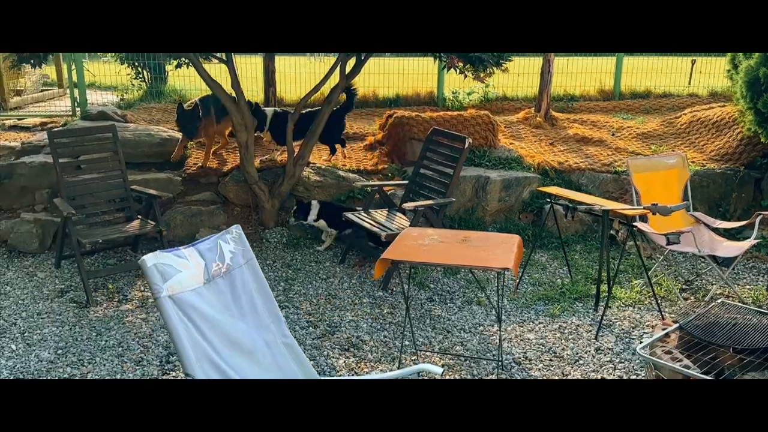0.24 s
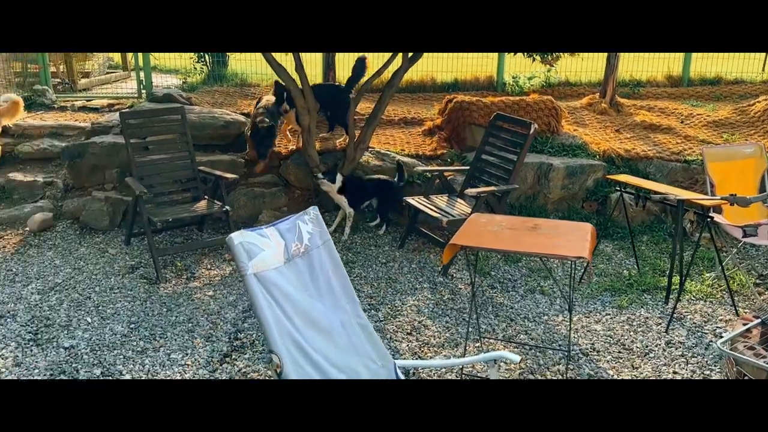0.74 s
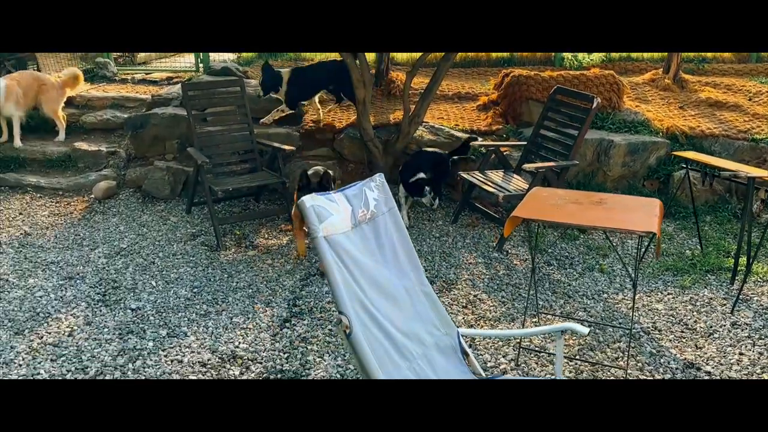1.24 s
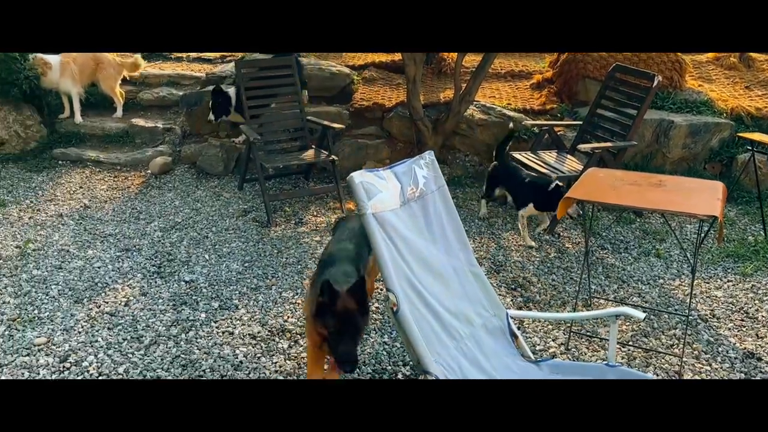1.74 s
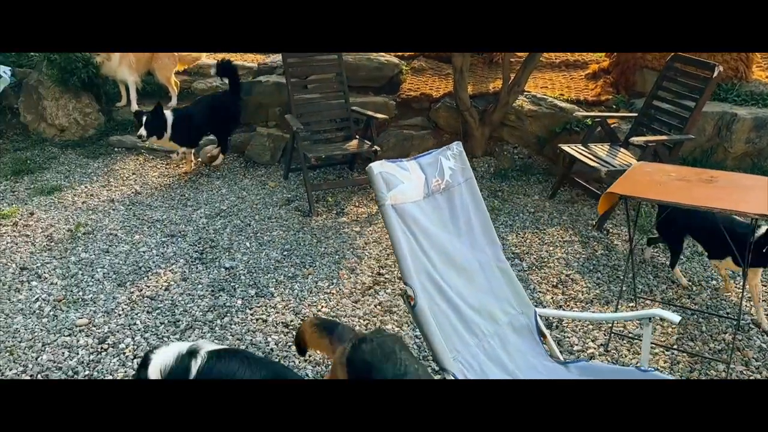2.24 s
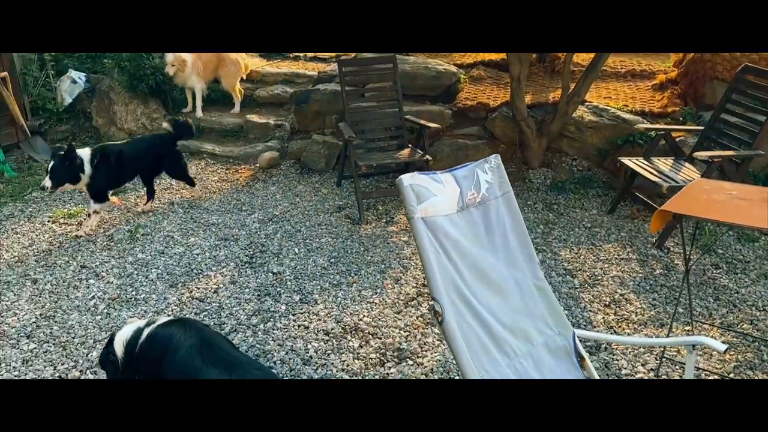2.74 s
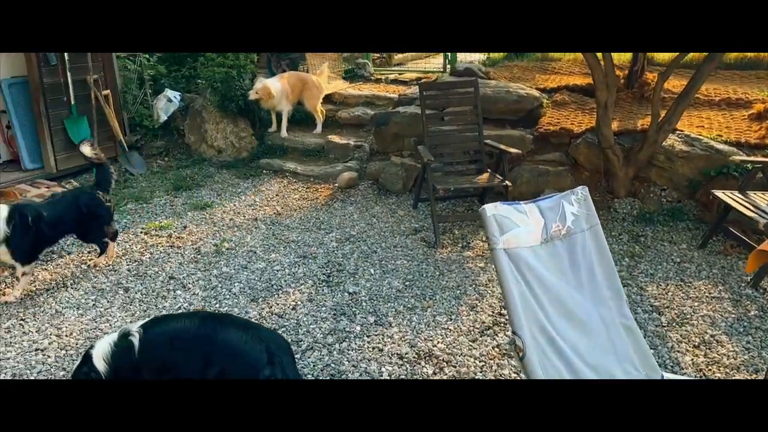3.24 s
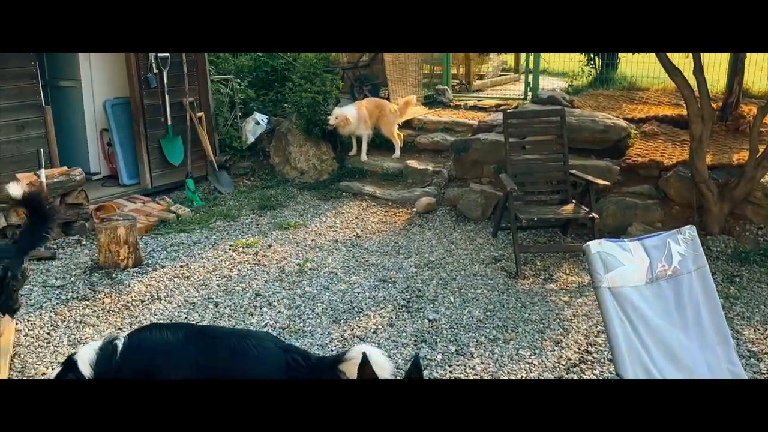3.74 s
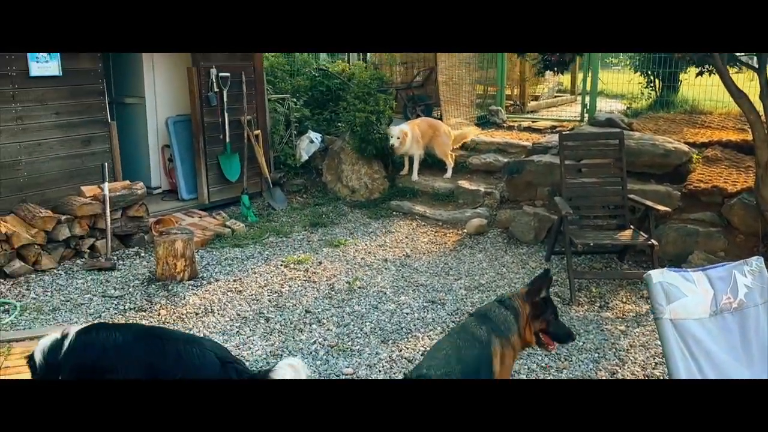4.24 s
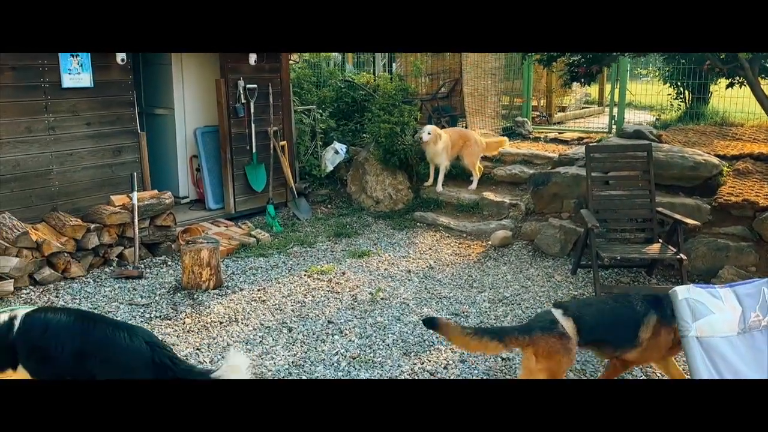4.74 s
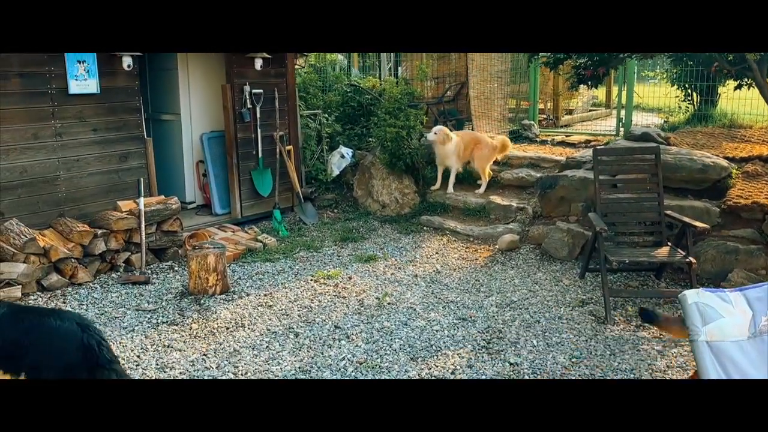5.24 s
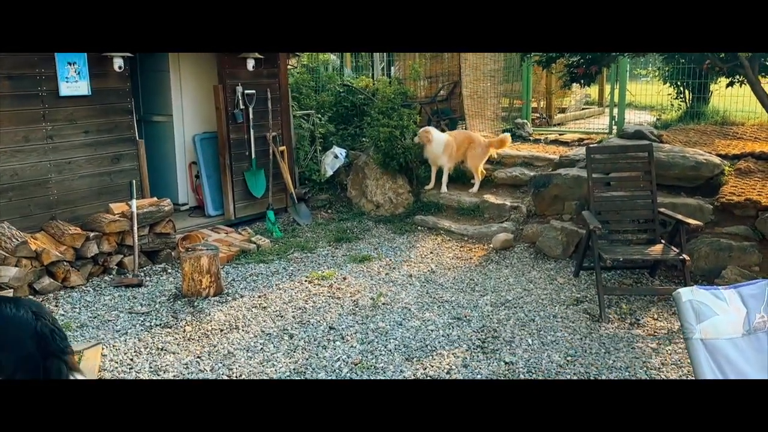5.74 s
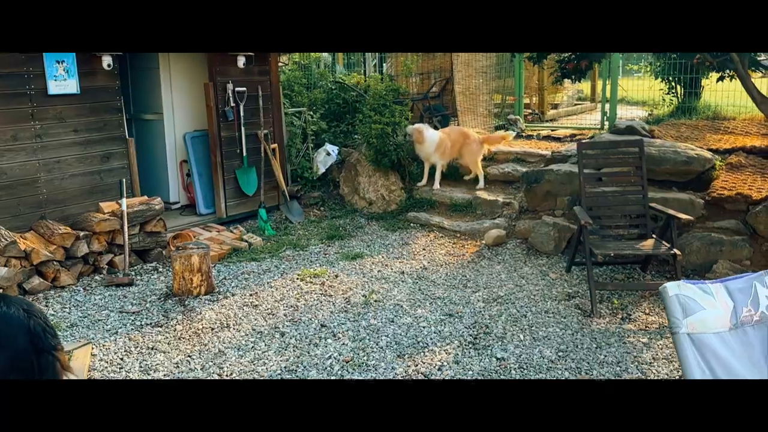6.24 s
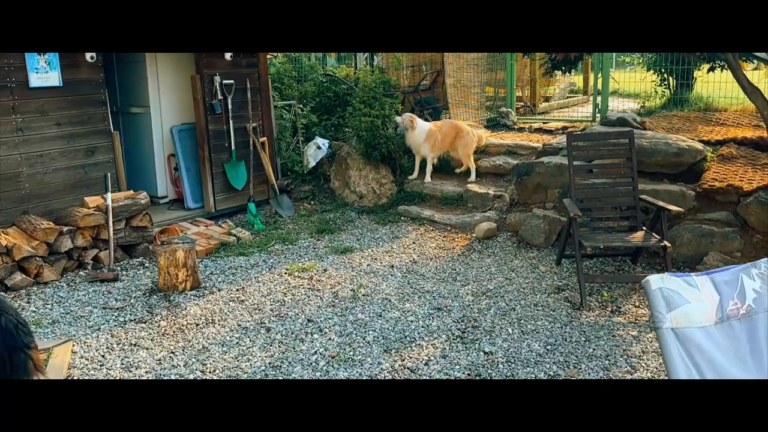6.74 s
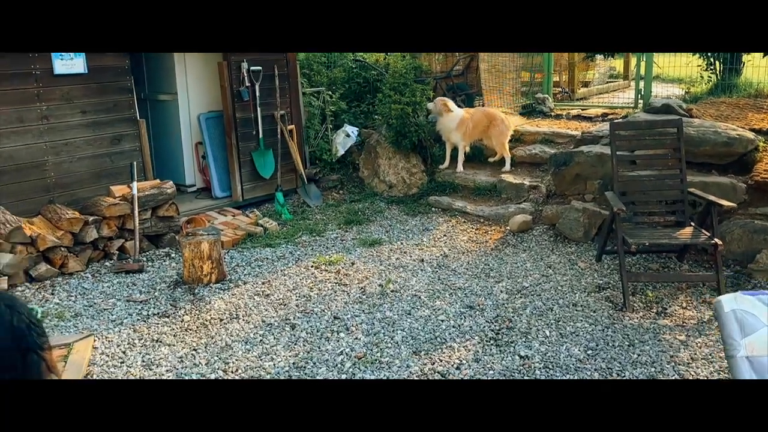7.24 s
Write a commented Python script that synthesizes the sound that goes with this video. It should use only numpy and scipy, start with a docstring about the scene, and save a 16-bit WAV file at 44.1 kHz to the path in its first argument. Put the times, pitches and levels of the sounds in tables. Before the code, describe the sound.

Quick panting from a bigger and a smaller dog mixes with paws scuffing gravel. A few dull taps come first, then the crunch comes nearer and brighter with crisp stone clicks. A short, high, rising and falling yip stands out near the middle, with slight echoes; a quieter one comes later, towards the right. Thin whistling whines and hoarse little huffs come between. Close, dry outdoor sound with a faint traffic rumble.

```python
"""Dogs in a gravel yard

Paws crunch on stones (ringing grains, noise and sharp snaps) and tongues pant (noise through throat resonances).
One dog yips twice, clear and near, then softer to the right, from a few harmonics and hoarse noise.
Three thin nasal whistles glide on curves of their own; voices get echoes and a short tail.
Taps and hoarse huffs come between, over the shaped noise of distant traffic and outdoor hiss."""
import sys
import numpy as np
from scipy import signal
from scipy.fft import rfft, irfft
from scipy.io import wavfile

SR = 44100
rng = np.random.default_rng(int(sys.argv[2]) if len(sys.argv) > 2 else 0)


def pcm_store(signal):
    """Save signal as 16-bit PCM."""
    levels = np.round(np.clip(np.atleast_2d(signal), -1, 1) * 32767)
    wavfile.write(sys.argv[1], SR, levels.astype(np.int16).T)


N = 330309   # length in samples, about 7.5 s

# Distant hum and outdoor hiss. Each row: frequency in Hz, relative level in dB.
AIR_SPECTRUM = [(25, -30.5), (42, -11.5), (66, 1), (95, -8), (170, -16), (400, -17), (1300, -20),
                (2600, -28.5), (6000, -24), (10000, -65.5), (13000, -35), (16500, -44)]
AIR_DB = -52.5
# How alike left and right are in the air sound. Each row: frequency in Hz, likeness from -1 to 1.
AIR_LIKENESS = [(60, 0.99), (150, 0.92), (380, 0.72), (950, -0.51), (2380, -0.78), (5980, 0.38),
                (15000, 0.91)]

# Steady shuffling and breath under the single events.
# Each row: time in seconds, shuffle level in dB, breath level in dB, ms by which the left side of the breath lags.
PACK = [(0, -57, -56, -0.19), (1, -56.5, -64, -0.14), (2, -52, -54.5, -0.065), (3.2, -47, -52, -0.094),
        (4.4, -49, -58.5, -0.098), (5.4, -56, -69.5, -0.25), (6.4, -55.5, -70.5, 0.17),
        (7.49, -55.5, -58.5, 0.097)]
# Paws set down and dragged. Each row: time in seconds, length scale in seconds, level in dB.
STEPS = [(0.082, 0.021, -52.5), (0.16, 0.1, -49.5), (0.4, 0.04, -48.5), (0.462, 0.032, -47),
         (0.512, 0.042, -39.5), (0.824, 0.072, -49.5), (0.938, 0.17, -52), (1.157, 0.079, -49),
         (1.302, 0.07, -48.5), (1.385, 0.11, -44.5), (1.561, 0.1, -48.5), (1.631, 0.21, -44),
         (1.858, 0.015, -36.5), (1.958, 0.051, -50), (2.064, 0.081, -36.5), (2.292, 0.13, -42),
         (2.543, 0.035, -61), (2.759, 0.049, -43.5), (2.821, 0.099, -40.5), (2.942, 0.051, -47),
         (3.09, 0.14, -42), (3.27, 0.07, -43.5), (3.394, 0.072, -45), (3.599, 0.15, -50.5),
         (3.868, 0.15, -53), (4.197, 0.3, -51), (4.4, 0.21, -40), (4.676, 0.17, -43), (4.904, 0.18, -40),
         (5.082, 0.079, -36), (5.245, 0.17, -44.5), (5.427, 0.25, -44.5), (5.769, 0.15, -47.5),
         (5.893, 0.078, -48.5), (5.991, 0.074, -50), (6.095, 0.062, -49), (6.198, 0.018, -44),
         (6.268, 0.079, -49.5), (6.484, 0.038, -47), (6.531, 0.1, -45), (6.65, 0.037, -52),
         (6.735, 0.12, -44.5), (6.932, 0.032, -43), (7.051, 0.067, -50), (7.242, 0.14, -61)]
# Tone colour of the gravel. Each row: frequency in Hz, relative level in dB.
GRAVEL_SPECTRUM = [(400, -24), (700, -9), (1200, -12.5), (2600, -9), (4400, -9), (7000, -2.5), (9600, -1),
                   (12000, -9.5), (15000, -10), (16500, -11.5)]
GRAINS_PER_S = 1300   # typical rate; it wanders
# Gain of the gravel's top octave, lower while the paws are far off. Each row: time in seconds, gain in dB.
TREBLE = [(0, -29), (0.9, -6), (1.7, -1), (2.3, 1), (3.2, 6), (4.7, -5.5), (5.4, -4), (7.49, -1.5)]
TREBLE_FROM_HZ = 10600
FULL_TURN_HZ = 9700   # sound from the ground: the left lags more with pitch, one whole cycle from here up

# Panted breaths. Each row: time in seconds, length scale in seconds, level in dB.
PANTS = [(0.062, 0.18, -47.5), (0.444, 0.12, -41), (0.82, 0.22, -45.5), (1.207, 0.057, -51),
         (1.303, 0.11, -45.5), (1.665, 0.14, -46), (1.804, 0.081, -48), (2.065, 0.11, -45),
         (2.34, 0.061, -46), (2.413, 0.044, -48.5), (2.659, 0.083, -43), (2.752, 0.03, -36),
         (3.107, 0.16, -49.5), (3.3, 0.048, -43), (3.38, 0.048, -42.5), (3.44, 0.068, -46.5),
         (3.889, 0.15, -46), (4.291, 0.18, -43), (4.708, 0.14, -45), (5.05, 0.2, -44), (5.583, 0.07, -41),
         (5.91, 0.091, -51), (6.237, 0.097, -48.5), (6.343, 0.11, -45), (6.697, 0.15, -50),
         (6.877, 0.23, -49), (7.18, 0.1, -52)]
# Panting throat of the bigger dog.
# Each row: frequency in Hz, width of each of two filter passes in Hz, relative level in dB.
THROAT = [(781, 320, 0.5), (1196, 477, 3), (1674, 447, 1), (2470, 660, -4.5)]
SMALL_THROAT_RISE = 1.225   # the smaller dog's resonances lie this many times higher
# How wide the panting mouths are open and who is heard.
# Each row: time in seconds, brightness in dB per octave, smaller dog's share of the power from 0 to 1.
GAPE = [(0, 4, .1), (0.9, 1, 0.3), (1.5, -4.5, 0.53), (2.3, -1, 0.39), (3.4, 3.5, 0.6), (3.95, 2, 0.3),
        (4.4, -4, 0.4), (5.1, 0.5, 0.4), (5.95, -4, .55), (6.4, -0.3, 0.8), (7.0, -3, 0.43),
        (7.49, 1.5, .15)]

# The loudest stones that snap under a paw.
# Each row: start in seconds, level in dB before a common trim, body level in dB relative to the crack.
STONES = [(0.17, -41.5, 24), (0.4165, -24, -19), (0.5235, -33.5, 17), (0.951, -36, 12.5),
          (0.9966, -25, -25), (1.0576, -21, -15), (1.069, -29.5, 5.5), (1.6963, -14.5, -0.5),
          (1.8626, -21, -29), (1.9226, -33, -31), (2.0875, -7, -4.5), (2.203, -27.5, 1), (2.322, -18, -23),
          (2.8459, -14.5, -22), (2.9818, -16.5, -27), (3.2044, -11, -10), (3.2944, -9.5, -34),
          (3.3068, -15, -25), (3.4682, -15, -27), (3.6293, -12, -21), (3.6648, -13, -8.5),
          (3.671, -18, -11), (3.912, -14.5, -10), (3.963, -13.5, -2), (3.969, -16.5, 7), (4.2098, -9, -18),
          (4.214, -11, -10), (4.224, -12, -1.5), (4.232, -17.5, -2), (4.2375, -11, -6),
          (4.2413, -10.5, -10), (4.4756, -12.5, -9), (4.4985, -12.5, -3), (4.697, -16, 5),
          (4.9281, -12.5, -18), (5.1633, -9, -4.5), (5.442, -36, -2), (5.8392, -14, -22),
          (5.909, -19.5, -20), (6.0529, -21.5, -17.5), (6.107, -28, -12), (6.203, -24.5, -19),
          (6.5453, -19, -20), (6.948, -32, -6), (7.1739, -25.5, -10)]
# Smaller snaps come at random; their level follows the pressing paw, before the same trim.
PEBBLES_PER_S, PEBBLE_OVER_CRUNCH_DB, PEBBLE_BODY_DB = 15, 17.5, -12

# Dull taps and thuds.
# Each row: start in seconds, starting level in dB, pitch in Hz, time to fall by 60 dB in seconds.
TAPS = [(0.276, -35, 1180, 0.019), (0.605, -23, 1250, 0.0081), (0.625, -35, 1200, 0.021),
        (0.655, -21.5, 1250, 0.008), (0.768, -36.5, 185, 0.061), (1.806, -32, 920, 0.016),
        (5.117, -26.5, 140, 0.014), (6.91, -30.5, 1180, 0.015)]

# Hoarse huffs. Each row: start in seconds, length in seconds, level of the voiced part in dB, pitch in Hz.
HUFFS = [(2.139, 0.06, -52, 472), (2.404, 0.11, -47.5, 431), (6.364, 0.102, -67, 498),
         (6.712, 0.1, -57, 480)]
# Throat of the huffs. Each row: frequency in Hz, width of each of two filter passes in Hz, relative level in dB.
HUFF_THROAT = [(496, 81, 3), (940, 100, -8), (1250, 140, 2.5), (2010, 80, -3)]

# Three nasal whines, one list for each. Each row: time in seconds, pitch in Hz, level in dB.
WHISTLES = [
    [(2.754, 3570, -40), (2.774, 3220, -38.5), (2.788, 3650, -37), (2.797, 3900, -42), (2.825, 3900, -49),
     (2.858, 4160, -44), (2.895, 3800, -52), (2.912, 3480, -37.5), (2.948, 3100, -45), (2.97, 3050, -53),
     (3.035, 3160, -55), (3.06, 3220, -62)],
    [(5.425, 3540, -47), (5.443, 3610, -45), (5.485, 3690, -54), (5.53, 3180, -59), (5.585, 3170, -64),
     (5.605, 2980, -46), (5.625, 3170, -37), (5.648, 2990, -45.5), (5.69, 3220, -55)],
    [(6.272, 3620, -52), (6.281, 3450, -32), (6.295, 3080, -48), (6.32, 3210, -43), (6.36, 3000, -54),
     (6.405, 3000, -42.5), (6.424, 3480, -47), (6.433, 3020, -44.5), (6.452, 3400, -48), (6.49, 3240, -60)],
]
# A whine starts on its octave. One value per whine: starting lead of the octave over the fundamental in dB.
OCTAVE_LEADS_DB = [5, 19, 18]
OCTAVE_FADES_DB_PER_S = 149   # and hands over to the fundamental

# The two yips, one list for each.
# Each row: time in seconds, pitch in Hz, fundamental level in dB, overtone level in dB.
YIPS = [
    [(2.785, 627, -31, -44), (2.794, 640.3, -7.5, -14.5), (2.82, 694, -12, -27.5), (2.832, 693, -8.5, -51),
     (2.847, 718, -13.5, -25), (2.86, 745, -18, -29), (2.87, 783, -29, -24), (2.882, 741, -18.5, -28),
     (2.904, 735, -21, -42), (2.917, 648, -30.5, -46), (2.934, 665, -31, -54)],
    [(5.445, 614, -52, -57), (5.455, 625, -27, -43), (5.482, 675, -33, -40.5), (5.498, 649, -20.5, -34),
     (5.53, 572, -40, -28), (5.545, 588, -51, -22.5), (5.56, 580, -28.5, -45), (5.59, 557, -53, -48)],
]
# Manner of each yip. Each row: left over right in dB, ms by which the left lags,
# third over second harmonic at the start in dB.
YIP_MANNER = [(-1, 0.02, 10.5), (-3, 0.48, 0.5)]
MOUTH_CLOSES_DB_PER_S = 238   # the third harmonic sinks under the second as the jaw shuts

# Yard echoes of walls and furniture. Each row: delay in ms, left level in dB, right level in dB.
ECHOES = [(59.5, -27.5, -29.5), (96., -38, -40.5)]
YARD_T60_S, YARD_DB = 0.13, -21   # tail: time to fall by 60 dB, level

# Shading by the microphone body. Each row: frequency in Hz, left over right in dB.
PORTS = [(60, 1.5), (130, 2), (290, 3.5), (640, 1), (1410, -4), (3100, -2.5), (6820, 6.5), (15000, -3)]
CAPSULE_HZ, CAPSULE_WIDTH_HZ, CAPSULE_DB = 10120, 1200, -3
CUTOFF_HZ = 16800   # from here up everything is at least 60 dB down

OPPOSITE = np.array([[1], [-1]])   # puts a sound into left and right with opposite sign


def from_db(db):
    """Gain of a level in dB."""
    return 10 ** (np.asarray(db) / 20)


def rms_one(x):
    """Scaled to rms 1."""
    return x / np.sqrt(np.mean(x ** 2) + 1e-20)


def in_time(rows):
    """Columns of a table at every sample, and a gate that is open while the table lasts."""
    s, *columns = np.transpose(rows)
    t = np.arange(N) / SR
    curves = [np.interp(t, s, column) for column in columns]
    gate = np.clip(np.minimum(t - s[0], s[-1] - t) / 0.0026, 0, 1)
    return curves + [gate]


def at_hz(points, hz):
    """A spectrum read on a log-frequency axis."""
    point_hz, values = np.array(points).T
    return np.interp(np.log(hz), np.log(point_hz), values)


def drift(rate):
    """Random wandering with a spread of about 1; a higher rate in Hz wanders faster."""
    r = np.exp(-16 * np.pi * rate / SR)   # made at an eighth of the sample rate
    chance = rng.standard_normal(N // 8 + 4002)
    slow = signal.lfilter([1], [1, -2 * r, r * r], chance)[4000:]   # skip the filter's start
    return np.interp(np.arange(N) / 8, np.arange(len(slow)), rms_one(slow))


def resonate(x, hz, width):
    """One resonance with gain of about 1 on top."""
    r = np.exp(-np.pi * width / SR)
    feedback = [1, -2 * r * np.cos(2 * np.pi * hz / SR), r * r]
    return signal.lfilter([(1 - r * r) / 2, 0, (r * r - 1) / 2], feedback, x + 1e-18)


def throat(x, modes, tilt_db=0.):
    """Steep resonances side by side, tilted by the opening of the mouth; rms 1."""
    out = 0
    for hz, width, db in modes:
        twice = resonate(resonate(x, hz, width), hz, width)
        out = out + from_db(db + tilt_db * np.log2(hz / 1240)) * twice
    return rms_one(out)


def colour(x, gain_db):
    """A smooth spectral shape given as a function of Hz."""
    hz = np.maximum(np.fft.rfftfreq(N, 1 / SR), 1)
    return irfft(rfft(x) * from_db(gain_db(hz)), N)


def place(x, pan_db, lag_ms=0.):
    """Left and right by level and by arrival time."""
    at = np.arange(N)
    left = np.interp(at - lag_ms * SR / 1000, at, x)
    return np.array([left * from_db(pan_db / 2), x * from_db(-pan_db / 2)])


def tone(hz, levels_db, gate, waver):
    """Harmonics on a pitch curve that wavers a little."""
    phase = 2 * np.pi * np.cumsum(hz * (1 + waver * drift(61))) / SR
    harmonics = sum(from_db(db) * np.sin((k + 1) * phase) for k, db in enumerate(levels_db))
    return np.sqrt(2) * gate * harmonics


def handover(level_db, lead_db):
    """Two partials share one level: the upper leads by lead_db, the stronger of them has the level."""
    return level_db - np.maximum(lead_db, 0), level_db + np.minimum(lead_db, 0)


def swells(rows, under_db, rise, hold, fall, late=0.):
    """Gain of events that swell, hold and die away, added in power to a steady level."""
    t = np.arange(0, N, 16) / SR   # every 16th sample is enough
    s, length, db = np.transpose(rows)[:, :, None]
    age = (t - s) / length - late   # rise, hold, fall and late are all shares of the length
    rising = np.clip(age / rise + 1, 0, 1) ** 2
    falling = np.exp(-np.clip((age - hold) / fall, 0, 30))
    power = (from_db(db) ** 2 * rising * falling).sum(axis=0)
    return np.sqrt(from_db(under_db) ** 2 + np.interp(np.arange(N) / SR, t, power))


def air():
    """Distant hum and outdoor hiss: noise in half-octave bands, each with its own left-right likeness."""
    out = 0
    edges = 22 * 2 ** np.arange(0, 9.6, .5)
    white = rng.standard_normal((2, 2, N))   # bands take turns with two noise pairs
    for k, (low, high) in enumerate(zip(edges, edges[1:])):
        band = signal.butter(2, [low, high], "band", fs=SR, output="sos")
        mid, side = signal.sosfilt(band, white[k % 2])
        alike = np.clip(at_hz(AIR_LIKENESS, np.sqrt(low * high)), -1, 1)
        out = out + np.sqrt(1 + alike) * mid + np.sqrt(1 - alike) * side * OPPOSITE
    return from_db(AIR_DB) * rms_one(colour(out, lambda hz: at_hz(AIR_SPECTRUM, hz)))


def crunch(gain):
    """Stones grind and click in clumps: uneven grains ring a few cycles on a bed of finer grit."""
    born = rng.random(N) < GRAINS_PER_S * from_db(5.0 * drift(40)) / SR
    sizes = born * from_db(1.7 * np.minimum(rng.exponential(1, N), 4)) * rng.choice([-1, 1], N)
    dealt = rng.integers(0, 14, N)   # each grain gets one of 14 pitches
    ringing = 0
    for k, hz in enumerate(np.geomspace(900, 15000, 14)):
        aside = rng.normal(0, 1, 2)   # each size of stone lies at a spot of its own
        grains = resonate(sizes * (dealt == k), hz, hz * 0.15) / np.sqrt(hz)
        ringing = ringing + place(grains, 1.3 * aside[0], 0.007 * aside[1])
    middle, side = rng.standard_normal((2, N))
    # left and right differ mainly below the top octave
    side = signal.sosfilt(signal.butter(2, 6000, fs=SR, output="sos"), side)
    grit = rms_one(middle + 2.12 * side * OPPOSITE)
    grit_gain = from_db(5.5 + 2.5 * drift(17) + 3.8 * drift(180))
    mix = rms_one(ringing) + grit_gain * grit
    return gain * rms_one(colour(mix, lambda hz: at_hz(GRAVEL_SPECTRUM, hz)))


def distance(pair):
    """The paws' treble is turned down while they are far off and lifted at other moments."""
    treble_db, _ = in_time(TREBLE)
    low = signal.sosfiltfilt(signal.butter(2, TREBLE_FROM_HZ, fs=SR, output="sos"), pair)
    return low + from_db(treble_db) * (pair - low)


def left_late(pair):
    """The left channel's phase falls behind up to one cycle."""
    cycles = np.minimum(np.fft.rfftfreq(N, 1 / SR) / FULL_TURN_HZ, 1)
    return np.array([irfft(rfft(pair[0]) * np.exp(-2j * np.pi * cycles), N), pair[1]])


def panting(gain, lag_ms):
    """Turbulent breath through the throats of a bigger and a smaller dog; a wider mouth is brighter."""
    tilt_db, share, _ = in_time(GAPE)
    share = np.clip(share, 0, 1)
    small = [(hz * SMALL_THROAT_RISE, width * SMALL_THROAT_RISE, db) for hz, width, db in THROAT]
    big_breath = throat(rng.standard_normal(N), THROAT, tilt_db)
    small_breath = throat(rng.standard_normal(N), small, tilt_db)
    aside = throat(rng.standard_normal(N), small, tilt_db)   # widens the stereo picture
    near = np.sqrt(1 - share) * big_breath + np.sqrt(share) * small_breath
    flicker = from_db(2.76 * drift(33))
    return gain * flicker * rms_one(place(near, 0., lag_ms) + 0.252 * aside * OPPOSITE)


def stones(rows):
    """Each snap is a bright crack and a duller body, then a short rattle of the neighbouring stones."""
    out = np.zeros((2, N))
    t = np.arange(round(.04 * SR)) / SR
    chance = rng.standard_normal((len(rows), 4, len(t)))
    for (s, db, body_db), (crack_noise, body_noise, lumps, other) in zip(rows, chance):
        rattle = from_db(-17 - 60 * t / 0.11 + 2.4 * lumps[(t * 900).astype(int)])
        # the last noise sample also sets a chance pitch
        crack_hz = 8800 * from_db(0.75 * crack_noise[-1])
        body_hz = 2400 * from_db(np.clip(3.1 * body_noise[-1], -12, 12))
        crack = (crack_noise + 0.27 * other * OPPOSITE) * (from_db(-60 * t / 0.005) + rattle)
        body = (body_noise + 0.34 * other * OPPOSITE) * (from_db(-60 * t / 0.0035) + rattle)
        crack = resonate(crack, crack_hz, 6500)
        body = resonate(body, body_hz, 2700)
        snap = crack / abs(crack).max() + from_db(body_db) * body / abs(body).max()
        piece = out[:, round(s * SR):round(s * SR) + len(t)]
        piece += from_db(db - 4.5) * snap[:, :piece.shape[1]]   # 4.5 dB is the common trim
    return out


def pebbles(gain):
    """Rows of chance snaps for stones(), their levels following the crunch around them, give or take."""
    at = np.flatnonzero(rng.random(N) < PEBBLES_PER_S / SR)
    spread = rng.standard_normal((N // 100 + 1, 2))[at // 100]
    rows = []
    for i, (louder, duller) in zip(at, spread):
        db = 20 * np.log10(gain[i]) + PEBBLE_OVER_CRUNCH_DB + 1.9 * louder
        rows.append((i / SR, db, PEBBLE_BODY_DB + 7.1 * duller))
    return rows


def taps():
    """Short damped rings with a soft start."""
    out = np.zeros(N)
    t = np.arange(N) / SR
    for s, db, hz, t60 in TAPS:
        age = np.maximum(t - s, 0)
        soft_start = 1 - np.exp(-age / 0.0008)
        out += from_db(db - 60 * age / t60) * soft_start * np.sin(2 * np.pi * hz * age)
    return place(out, 0., 0.037)


def huffs():
    """Half-voiced grunts: shaky harmonics, and breath noise through a longer, narrower throat."""
    out = 0
    t = np.arange(N) / SR
    for s, length, db, hz in HUFFS:
        shape = from_db(db) * np.sin(np.pi * np.clip((t - s) / length, 0, 1)) ** 0.33
        shaky = from_db(6.3 * drift(54))
        voiced = tone(np.full(N, float(hz)), [-2.5, 3, -13.0, -16, -24], shaky, waver=0.016)
        breath = throat(rng.standard_normal(N), HUFF_THROAT)
        out = out + shape * (rms_one(voiced) + from_db(6.5) * breath)
    return place(out, 0., 0.17)


def whistles():
    """A second, high oscillation in the nose, fluttering in strength."""
    out = 0
    for rows, lead_db in zip(WHISTLES, OCTAVE_LEADS_DB):
        hz, db, gate = in_time(rows)
        age = np.clip(np.arange(N) / SR - rows[0][0], 0, 1)
        levels_db = handover(db, lead_db - OCTAVE_FADES_DB_PER_S * age)
        out = out + tone(hz, levels_db, gate, waver=0.014)
    flutter = from_db(3.0 * drift(44) + 2.6 * drift(200))
    return place(out * flutter, 1.8, lag_ms=0.11)


def yips():
    """Clean glottal tone of five harmonics; hoarse breath noise follows the fundamental's level."""
    out = 0
    for rows, (pan_db, lag_ms, open_db) in zip(YIPS, YIP_MANNER):
        hz, one, over, gate = in_time(rows)
        age = np.clip(np.arange(N) / SR - rows[0][0], 0, 1)
        two, three = handover(over, open_db - MOUTH_CLOSES_DB_PER_S * age)
        clean = tone(hz, [one, two, three, three - 21, three - 36], gate, waver=0.0023)
        breath = throat(rng.standard_normal(N), [(986, 390, 15), (2280, 900, -13.5)])
        hoarse = gate * from_db(one - 24.0) * breath
        out = out + place(clean + hoarse, pan_db, lag_ms)
    return out


def yard(x):
    """Two distinct echoes, and a dense dull tail of fading noise."""
    out = x.copy()
    for ms, *sides_db in ECHOES:
        lag = round(ms * SR / 1000)
        out[:, lag:] += from_db(sides_db)[:, None] * x[:, :-lag]
    t = np.arange(SR // 2) / SR
    tail = rng.standard_normal((2, len(t))) * from_db(-60 * t / YARD_T60_S) * np.clip(t / 0.027, 0, 1)
    tail = signal.lfilter([1], [1, -.8], tail)   # dulls it
    tail = tail / np.sqrt(np.sum(tail ** 2, axis=1, keepdims=True))
    return out + from_db(YARD_DB) * signal.fftconvolve(x, tail, axes=1)[:, :N]


def scene():
    """Voices in the yard's echoes, the near paws and breath dry."""
    shuffle_db, breath_db, lag_ms, _ = in_time(PACK)
    tread = swells(STEPS, shuffle_db, rise=0.027, hold=0.58, fall=0.12)
    lungs = swells(PANTS, breath_db, rise=.55, hold=.25, fall=.22, late=.3)
    paws = crunch(tread) + stones(STONES) + stones(pebbles(tread))
    breath = panting(lungs, lag_ms) + huffs()
    voices = yard(whistles() + yips())
    return air() + left_late(distance(paws)) + breath + taps() + voices


def record(dry):
    """The microphone body shades each side by frequency, the capsules ring near the top, which is cut."""
    left = colour(dry[0], lambda hz: at_hz(PORTS, hz) / 2)
    right = colour(dry[1], lambda hz: -at_hz(PORTS, hz) / 2)
    shaded = np.array([left, right])
    shaded = shaded + from_db(CAPSULE_DB) * resonate(shaded, CAPSULE_HZ, CAPSULE_WIDTH_HZ)
    return signal.sosfilt(signal.cheby2(12, 60, CUTOFF_HZ, fs=SR, output="sos"), shaded)


dry = scene()
out = record(dry)
pcm_store(out)
```